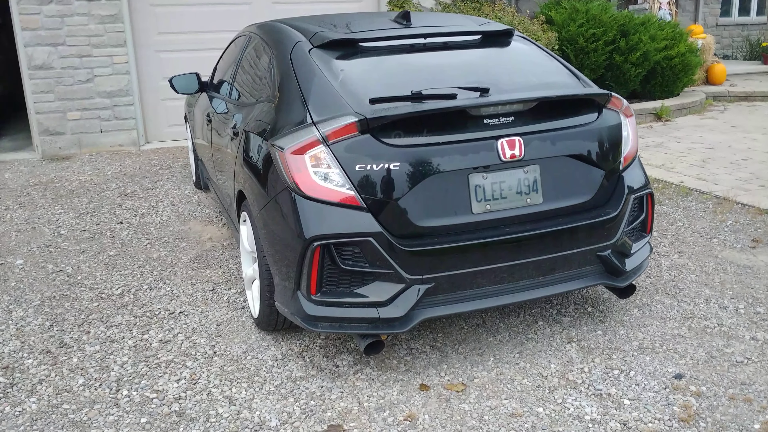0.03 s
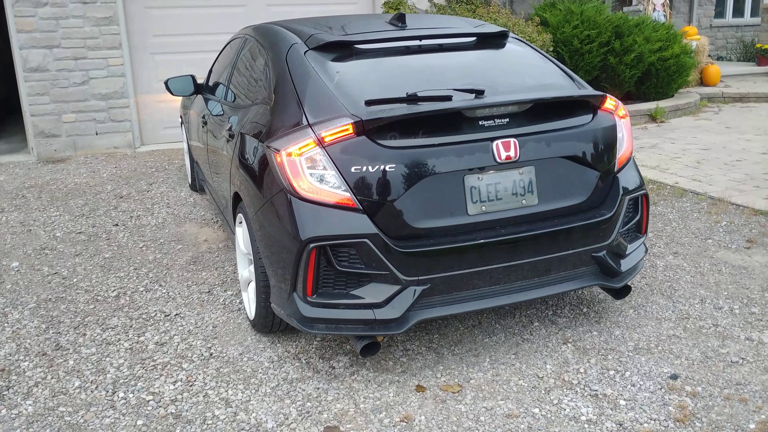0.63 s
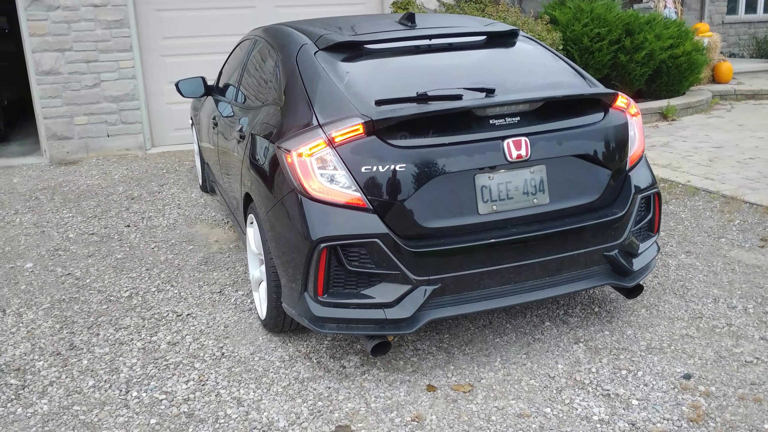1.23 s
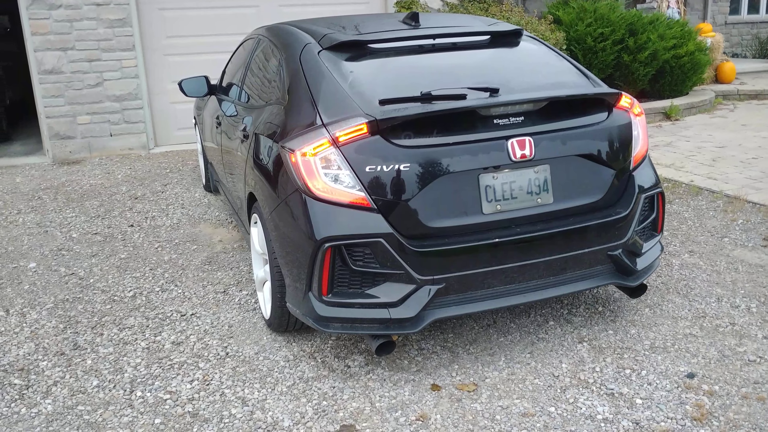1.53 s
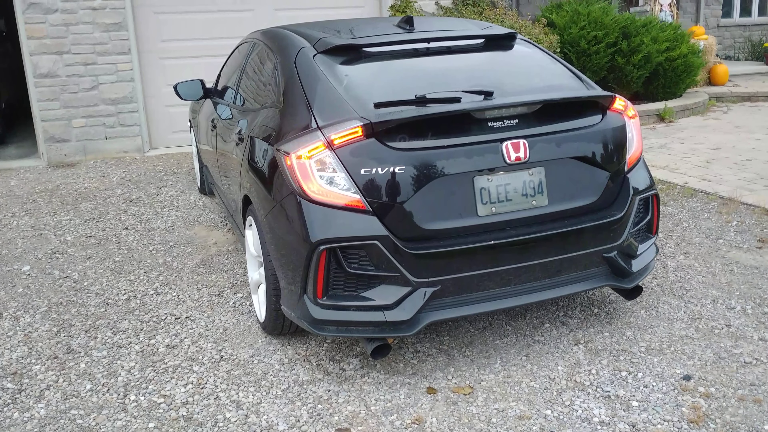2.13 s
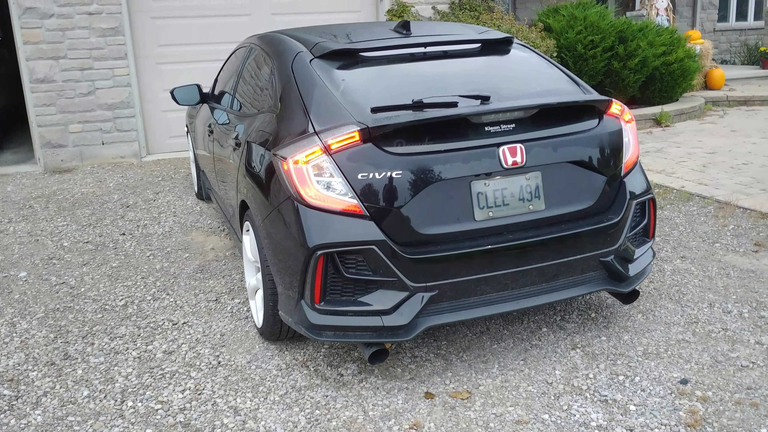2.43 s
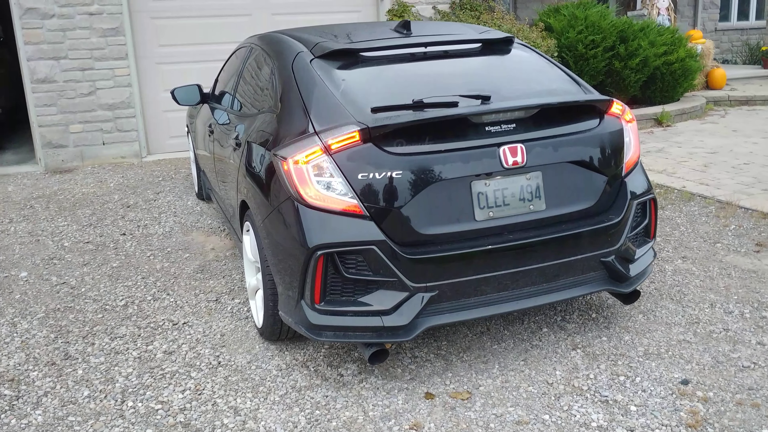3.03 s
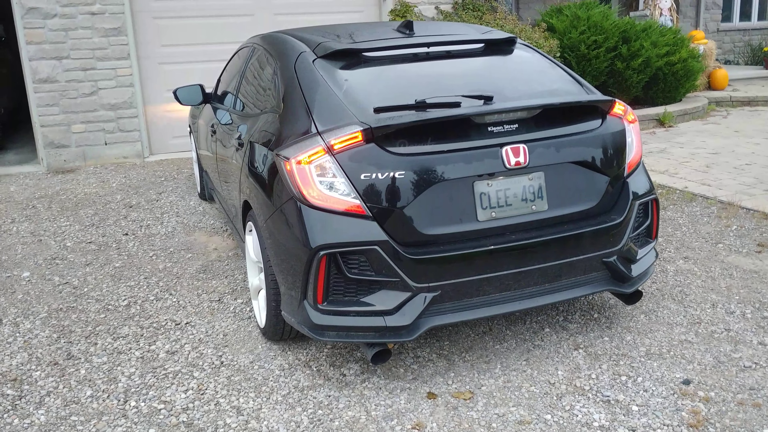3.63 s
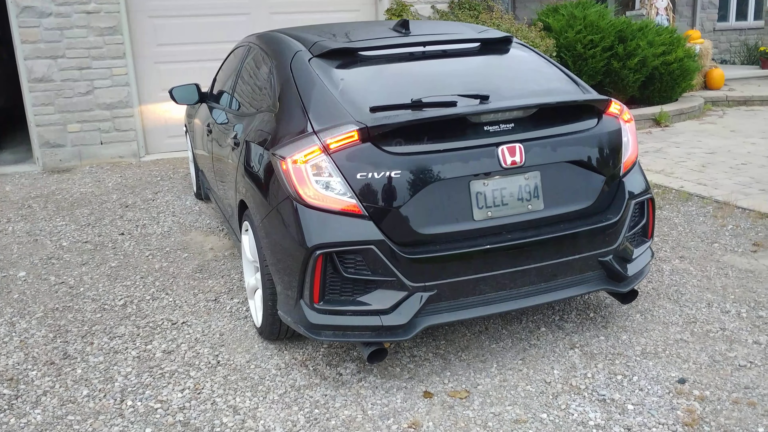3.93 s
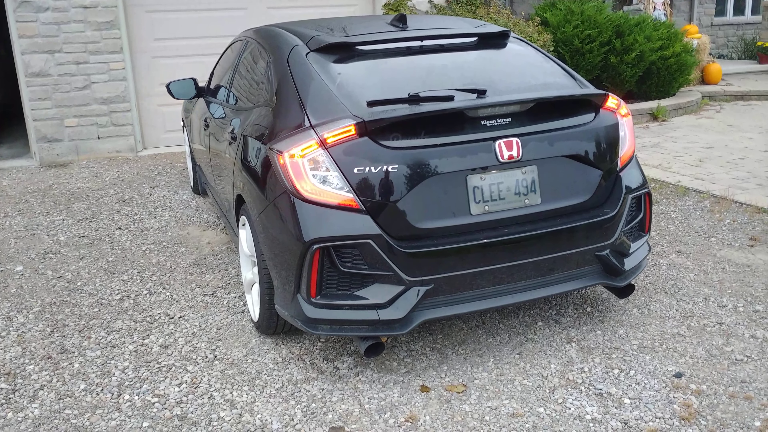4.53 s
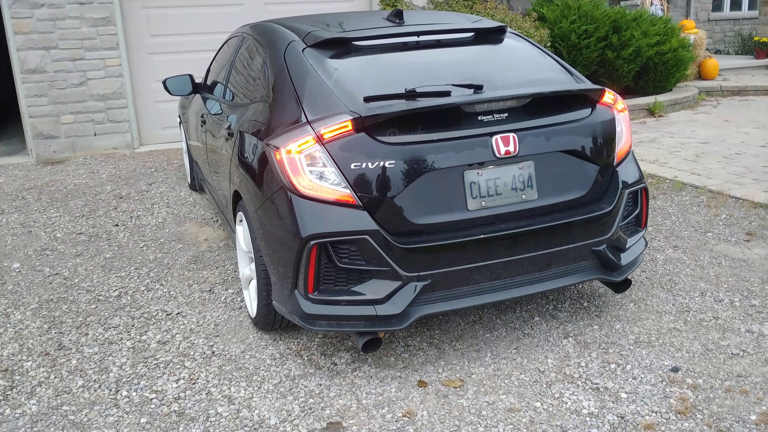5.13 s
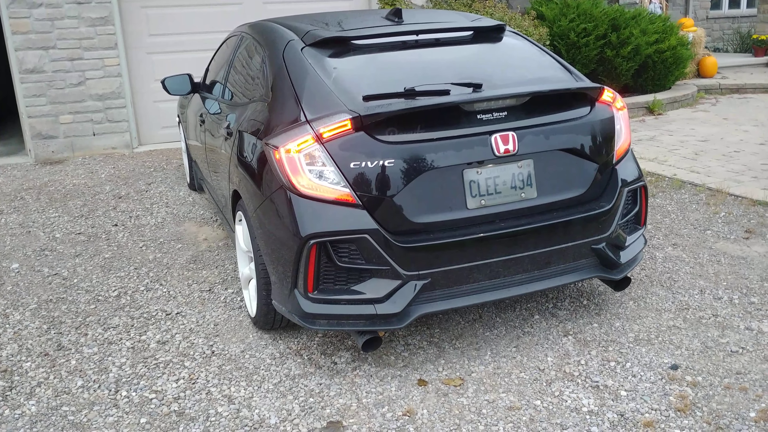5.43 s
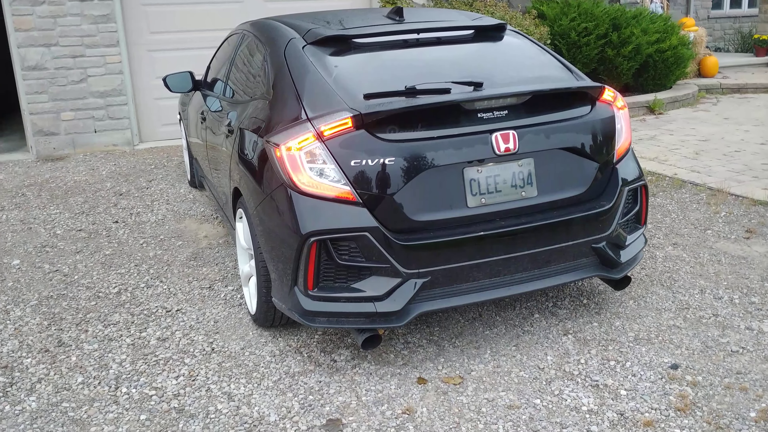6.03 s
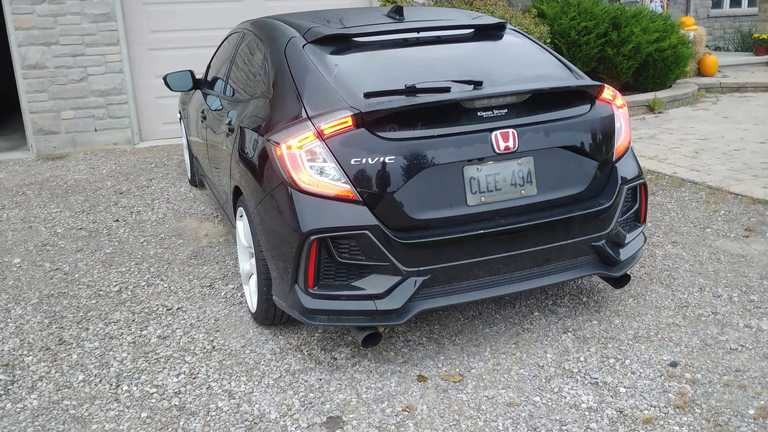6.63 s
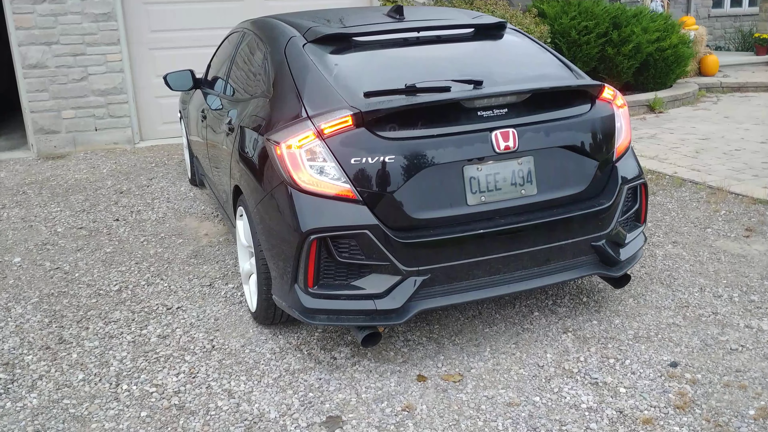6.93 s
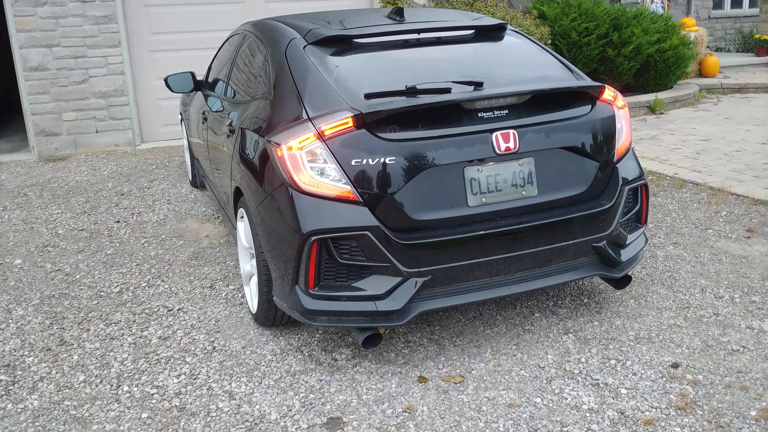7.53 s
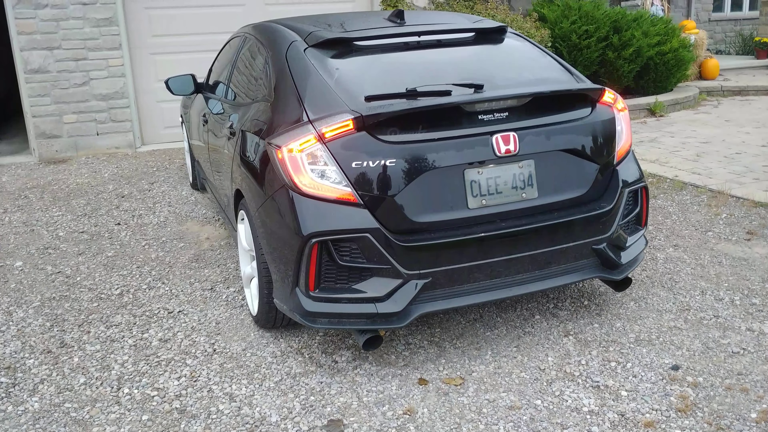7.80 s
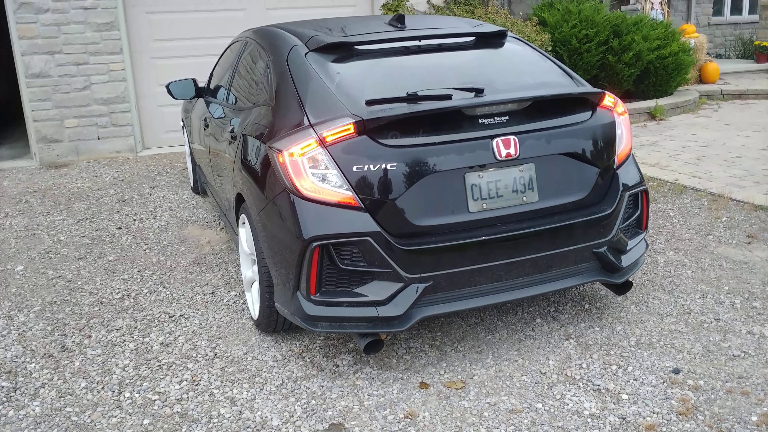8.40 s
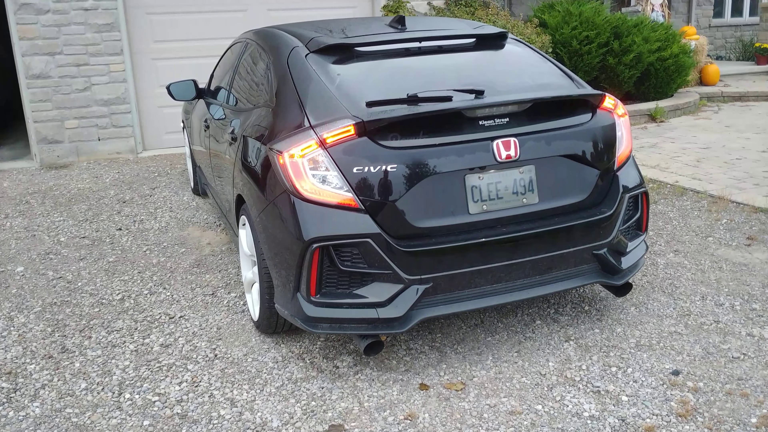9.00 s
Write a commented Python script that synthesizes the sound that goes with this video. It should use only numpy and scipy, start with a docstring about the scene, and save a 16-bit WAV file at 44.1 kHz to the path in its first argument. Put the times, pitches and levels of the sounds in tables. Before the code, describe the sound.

A quiet driveway opens with a low wash of distant traffic and very faint crickets. In the first second a shoe shifts on gravel, crunching softly with a slight thud. Small birds give thin, gliding chirps from about 1.5 to 2.8 seconds, while a far car's tyres swell gently. At 3.2 seconds a car's starter clashes in and whirrs in a few quick pulses. The cold four-cylinder engine coughs at 3.7 seconds and catches by 3.9 with a small pop, far louder than the surroundings. It runs raggedly at first, its speed flaring to a peak around 5 seconds, then eases into a booming fast idle that holds until the end, just past 9 seconds. The microphone is behind the car, so the deep, pulsing exhaust drone dominates, with a light rasp of gas and a faint engine sizzle. Occasional chirps remain faintly audible.

```python
"""A shoe shifts on a gravel driveway over far traffic, small birds and faint crickets.
Some three seconds in, a four-cylinder car is started from cold, with the microphone behind it.
The starter clashes in and whirrs; the engine stumbles, catches, flares and settles to a booming fast idle.
Each firing sends a slug of gas down the free-flowing exhaust, ringing its silencer and pipe,
while the engine bay sizzles from the far end of the car."""
import sys
import numpy as np
from scipy import signal
from scipy.fft import rfft, irfft
from scipy.io import wavfile

SR = 44100
rng = np.random.default_rng(int(sys.argv[2]) if len(sys.argv) > 2 else 0)


def transcribe(u):
    """Save the signal u as a 16-bit wav file named by the first command-line argument.

    u: samples, shape (n,) or (channels, n), limited to [-1, 1]; the rate is SR.
    q: integer samples, one column per channel.
    """
    v = np.clip(np.atleast_2d(u).T, -1, 1)
    q = np.round(v * 32767).astype(np.int16)
    wavfile.write(sys.argv[1], SR, q)


N = 408366
TIME = np.arange(N) / SR
RUNNING_S = 3.893   # the engine runs by itself from here

# the engine's first coughs on the starter: (time [s], strength [dB])
COUGHS = [(3.722, -7.5), (3.777, -4.5), (3.826, -3), (3.858, -1)]
# engine speed: (time [s], firing rate [Hz])
FIRING_RATE = [(3.893, 35.06), (4.2, 45.19), (4.42, 48.53), (4.8, 56.3), (5.03, 58.37), (5.33, 56.91),
               (5.6, 56.93), (5.95, 55.21), (6.4, 52.65), (6.85, 51.3), (7.4, 50.55), (7.7, 51.02),
               (8.0, 51.11), (8.42, 51.81), (8.93, 50.51), (9.26, 51.38)]
# engine load, light in the flare and heavy in the fast idle: (time [s], load above idle [dB])
ENGINE_LOAD = [(3.9, -16.5), (4.15, -14), (4.5, -13.5), (4.75, -8), (5.2, 0), (5.55, -0.5), (6.4, 3.5),
               (6.9, 3), (7.45, 0.5), (8.4, 4.5), (8.95, 2), (9.26, 3.3)]


def exhaust(front_lag_s=0.0027, gulp_ends_s=4.02, gulp_fade_s=0.055):
    """The tailpipe, nearest the microphone: each slug of gas drones, booms, barks and hisses."""
    load_db, = in_time(ENGINE_LOAD)
    # the first firings gulp the air standing in the manifold: fatter, duller slugs
    gulp = np.exp(-np.maximum(TIME - gulp_ends_s, 0) / gulp_fade_s)
    times, slug_db, front_db = firings()
    slugs, fronts = clicks(times, slug_db), clicks(times + front_lag_s, front_db)
    puffs = gas_puffs(times, front_db)
    # (sound, level at idle [dB], growth [dB per dB of load], lift from the gulp [dB])
    parts = [(silencer_drone(slugs), -25.1, .6, 10),
             (pipe_boom(slugs, gulp), -24, .2, 1.5),
             (pipe_bark(fronts, puffs, gulp, load_db), -29.5, .56, 8),
             (gas_rasp(puffs), -46.5, .5, 7.5)]
    return sum(from_db(db + growth * load_db + gulp_db * gulp) * x / x[TIME > RUNNING_S].std()
               for x, db, growth, gulp_db in parts)


def firings(jitter_s=.000025, slug_scatter_db=0.57, front_scatter_db=1.11, ragged_fade_s=0.49):
    """Time, slug strength and front strength of every firing; the cold engine runs raggedly at first."""
    # cylinders in firing order: (slug strength [dB], front strength [dB], lateness [s])
    cylinders = [(-0.25, -5.5, -.0012), (-0.5, 0.5, -.0014), (-0.83, -4.5, -.0012), (0, 0.5, -.0014)]
    count = np.cumsum(in_time(FIRING_RATE)[0] * (TIME > RUNNING_S)) / SR
    beats = np.interp(np.arange(int(count[-1]) + 1) + 1e-6, count, TIME)
    slug_db, front_db, late_s = np.array(cylinders)[np.arange(len(beats)) % len(cylinders)].T
    cough_s, cough_db = np.transpose(COUGHS)
    times = np.r_[cough_s, beats + late_s]
    ragged = 1 + 3.6 * np.exp(-np.maximum(times - RUNNING_S, 0) / ragged_fade_s)
    load_db = np.interp(beats, *np.transpose(ENGINE_LOAD))
    unequal = np.interp(load_db, [-20, 7], [.25, 1])   # load brings out the cylinders' uneven fronts
    chance = rng.standard_normal((len(times), 3)).T * ragged
    slug_db = np.r_[cough_db, slug_db] + slug_scatter_db * chance[1]
    front_db = np.r_[cough_db, front_db * unequal] + front_scatter_db * chance[2]
    return times + jitter_s * chance[0], slug_db, front_db


def silencer_drone(slugs):
    """Slugs ring the silencer, swelling where a multiple of the firing rate meets a resonance."""
    # deep resonances of the silencer: (frequency [Hz], width [Hz], relative gain [dB], polarity)
    modes = [(52, 11, -34, -1), (70.2, 7.2, 4.5, -1), (98.7, 4.7, 12.5, 1)]
    return cut(cut(ring(slugs, modes), 63, "high"), 760, "low")


def pipe_boom(slugs, gulp):
    """Slugs set the column of gas in the pipe booming."""
    # low standing waves: (frequency [Hz], width [Hz], relative gain [dB], polarity)
    modes = [(148.94, 6.7, 4.5, -1), (160.8, 21.7, 3, -1), (222.66, 6.3, 6.5, 1), (281.7, 9.7, 3, 1)]
    return cut(ring(slugs, modes, db_per_octave=-11 * gulp), 700, "low")


def pipe_bark(fronts, puffs, gulp, load_db):
    """The steep front of each pulse and the churning gas ring the pipe higher up."""
    # upper standing waves: (frequency [Hz], width [Hz], relative gain [dB], polarity)
    modes = [(335.5, 24.4, 1.5, -1), (359.6, 7.2, -2.5, 1), (398, 6, -15.5, -1), (444.6, 11, -8.5, 1),
             (470.8, 41.7, -2.5, 1), (504.5, 8.1, -11, 1), (538.7, 16, -5.5, 1), (611.3, 15, -8.5, 1),
             (636.6, 10, -9.5, -1), (701.8, 16, -5.5, -1), (725, 16, -10.5, -1), (807, 6, -14, 1)]
    churn = from_db(-14 + 7 * gulp) * puffs * rng.standard_normal(N)
    edge = .4 * load_db - 2 * gulp   # fronts steepen with load
    bark = -ring(rms_one(fronts) + churn, modes, db_per_octave=edge)
    return cut(cut(bark, 800, "low", order=10), 290, "high", order=4)


def gas_puffs(times, front_db, lag_s=0.002, decay_s=0.011, scatter_db=2.0):
    """Envelope of the turbulence as each slug leaves the tip."""
    gusts = clicks(times + lag_s, 0.17 * front_db + scatter_db * rng.standard_normal(len(times)))
    fading = signal.lfilter([1], [1, -np.exp(-1 / (decay_s * SR))], gusts)
    return rms_one(cut(fading, 260, "low"))


def gas_rasp(puffs):
    """Gas hisses out in puffs; between them a steady flow builds as the engine gathers speed."""
    # rushing gas: (frequency [Hz], relative density [dB])
    spectrum = [(400, -38.5), (800, 5.5), (1100, -2.5), (1400, 1.5), (1650, -0.5), (1950, -11.5),
                (2500, -9.5), (3200, -33), (4700, -15), (6000, -47)]
    flow = np.interp(TIME, [COUGHS[0][0], 4.4], [0, .7])
    return (puffs + flow) * noise(spectrum)


def fuel_pops(attack_s=0.0011):
    """Unburnt fuel cracks in the pipe and rings its tip."""
    # pops: (time [s], level [dB], decay [s])
    pops = [(3.864, -34.5, 0.0049), (7.821, -34, 0.01)]
    return sum(from_db(db) * swell(s, attack_s, 0, decay) for s, db, decay in pops) * tone(1100, 750)


def starter(mesh_hz=1240, clatter_db=-2, housing_db=-6, groan_db=-3, clash_s=3.228, clash_db=-36.5):
    """The pinion clashes in; the motor groans and gear teeth rattle the housing until the engine runs."""
    # resonances of the housing: (frequency [Hz], width [Hz], relative gain [dB])
    modes = [(3330, 110, 14), (4940, 60, 11), (6400, 370, 4), (7130, 98, 12), (8230, 110, -8),
             (8300, 58, -14)]
    # gear clatter: (frequency [Hz], relative density [dB])
    clatter_spectrum = [(710, -32), (1200, -15), (1570, 16), (1780, -18), (2340, 8), (3450, -9), (3870, 2),
                        (4870, 4), (5600, -3), (6190, 3), (8600, -3.5), (11200, -38), (18900, -120)]
    # the pinion hitting the ring gear: (frequency [Hz], relative density [dB])
    clash_spectrum = [(60, -18), (130, -3), (430, -6), (600, -15), (1000, -1), (1500, -8), (3700, -14),
                      (7200, -8), (8700, -22), (11000, -37), (15500, -42)]
    # the motor labours at each compression: (time [s], level [dB])
    compressions = [(3.27, -55.5), (3.436, -52), (3.619, -52.5), (3.741, -48.5), (3.84, -49.5)]
    teeth_passed = np.floor(np.cumsum(mesh_hz * (1 + 0.033 * drift(25))) / SR)
    knocks = np.diff(teeth_passed, prepend=0) * (1 + 2 * rng.standard_normal(N))
    ringing = sum(from_db(db) * resonate(knocks, hz, width) for hz, width, db in modes)
    housing = rms_one(cut(ringing, 12000, "low", order=4))
    clatter = colour(grains(per_s=11000, spread_db=1.5), clatter_spectrum)
    groan = tone(383, 90) + tone(970, 210)
    whirr = from_db(clatter_db) * clatter + from_db(housing_db) * housing + from_db(groan_db) * groan
    efforts = [from_db(db) * swell(s, attack_s=.014, hold_s=.077, decay_s=.058)
               for s, db in compressions]
    clash = swell(clash_s, attack_s=.019, hold_s=.022, decay_s=.016) * noise(clash_spectrum)
    return np.max(efforts, axis=0) * whirr + from_db(clash_db) * clash


def engine_bay(onset_s=0.11, idle_db=-54, idle_hz=51.3, db_per_octave=5):
    """At the far end of the car, injectors, valves and belts merge into a sizzle that grows with speed."""
    # the bay heard from behind: (frequency [Hz], relative density [dB])
    spectrum = [(1700, -2), (3000, -8), (3900, -7), (4300, -9.5), (4700, -10), (5400, -15.5), (6500, -13.5),
                (7250, -11.5), (8400, -17), (9300, -25), (10200, -22.5), (11500, -29), (13200, -26),
                (15500, -42)]
    running = np.clip((TIME - COUGHS[0][0]) / onset_s, 0, 1)
    level_db = idle_db + db_per_octave * np.log2(in_time(FIRING_RATE)[0] / idle_hz)
    return running * from_db(level_db) * colour(grains(per_s=9000, spread_db=3.5), spectrum)


def shoe_on_gravel(thud_s=.37, thud_db=-46):
    """Driveway stones grind under a shoe; the heaviest shift also thuds in the ground."""
    # shifts of the shoe: (time [s], level [dB], rise and fall time [s])
    scuffs = [(0.274, -54, .006), (0.332, -49.5, 0.011), (0.367, -43, 0.014), (0.403, -52, 0.013),
              (.44, -56, 0.011), (0.707, -52, 0.015), (0.926, -54.5, 0.021), (7.333, -54.5, 0.018)]
    # grinding stones: (frequency [Hz], relative density [dB])
    spectrum = [(1180, -22), (2000, 2.5), (4110, -7), (4500, -5), (5440, -14), (5960, -4), (7940, -4),
                (8600, -12), (11200, -28), (18900, -120)]
    press = sum(from_db(db) * np.exp(-np.abs(TIME - s) / fall) for s, db, fall in scuffs)
    ground = rms_one(resonate(rng.standard_normal(N), 350, 250))
    thud = from_db(thud_db) * np.exp(-np.abs(TIME - thud_s) / 0.11) * ground
    return press * colour(grains(per_s=1900, spread_db=7), spectrum) + cut(thud, 940, "low")


def birds(echo_db=-6, echo_decay_s=0.038):
    """Gliding whistles, some buzzy, reach the microphone directly and off the walls of the house."""
    # notes: (time [s], length [s], start [Hz], middle [Hz], end [Hz], buzz [share of pitch], level [dB])
    notes = [(0.68, 0.19, 7750, 7400, 7330, 0.021, -65), (1.52, 0.46, 8130, 8250, 7800, 0.01, -71),
             (1.677, 0.096, 5800, 5620, 5960, 0.07, -57.5), (1.74, 0.14, 6170, 6580, 5100, 0.04, -58.5),
             (1.883, 0.24, 4050, 4400, 4940, 0.059, -65), (2.143, 0.087, 6740, 5780, 5050, 0.06, -56.5),
             (2.348, 0.081, 4200, 3780, 3380, 0.04, -57), (2.574, 0.068, 7600, 7550, 7400, 0.02, -69),
             (2.6, 0.09, 3950, 4000, 3700, 0.04, -68), (2.676, 0.13, 6200, 6240, 6840, 0.015, -72),
             (4.648, 0.07, 8400, 7800, 7550, 0.022, -63), (4.722, 0.088, 6450, 6050, 5350, 0.13, -59),
             (5.016, 0.17, 3600, 3080, 2860, 0.016, -57.5),
             (5.536, 0.052, 10100, 10260, 10300, 0.0034, -63), (6.27, 0.023, 3260, 3700, 4220, 0.031, -53),
             (6.614, 0.029, 7300, 7300, 7250, 0.012, -61.5), (7.53, 0.051, 3830, 3360, 4220, 0.006, -53),
             (8.214, 0.15, 6500, 6500, 6660, 0.015, -66), (8.362, 0.034, 4120, 3560, 4000, 0.015, -53.5),
             (8.868, 0.068, 4070, 3780, 3290, 0.02, -52.5)]
    song, buzz = np.zeros(N), drift(380)
    for s, length, start_hz, middle_hz, end_hz, depth, db in notes:
        at = np.flatnonzero((TIME >= s) & (TIME < s + length))
        progress = np.linspace(0, 1, len(at))
        glide = np.polyfit([0, .5, 1], [start_hz, middle_hz, end_hz], 2)
        hz = np.polyval(glide, progress) * (1 + depth * buzz[at])
        arch = np.sqrt(2 * np.abs(np.sin(np.pi * progress)))
        song[at] += from_db(db) * arch * np.sin(2 * np.pi * np.cumsum(hz) / SR)
    walls = rng.standard_normal(SR // 2) * np.exp(-TIME[:SR // 2] / echo_decay_s)
    return song + from_db(echo_db) * signal.fftconvolve(song, walls / np.linalg.norm(walls))[:N]


def far_traffic(waver_db=.5, hum_db=-61, pass_s=3.16, pass_db=-49.5, pass_width_s=.8):
    """A distant road with a faint hum; the narrow roar of one car's tyres comes and goes."""
    # the road heard from the driveway: (time [s], level [dB])
    levels = [(0, -44.5), (1.6, -47.5), (3.2, -47.5)]
    # its rumble: (frequency [Hz], relative density [dB])
    spectrum = [(21, -50), (35, -9.5), (96, -3.5), (242, -11), (266, -12), (312, -12), (421, -13.5),
                (987, -6.5), (2980, -18), (4840, -33), (7660, -37.5), (8600, -45.5), (11200, -62.5),
                (18900, -120)]
    road_db = in_time(levels)[0] + waver_db * drift(9)
    road = from_db(road_db) * cut(noise(spectrum), 54, "high", order=3)
    nearness = 1 / np.hypot(1, (TIME - pass_s) / pass_width_s)
    return road + from_db(pass_db) * nearness * tone(822, 240) + from_db(hum_db) * tone(452, 38)


def crickets(near_db=-76, far_db=-77, stroke_hz=25.6):
    """The nearer cricket pulses its wings; a farther one blurs into a steady trill."""
    strokes = rms_one(1 + np.sin(2 * np.pi * stroke_hz * TIME))
    return from_db(near_db) * strokes * tone(5380, 210) + from_db(far_db) * tone(5970, 92)


def from_db(db):
    """Decibels to gain."""
    return 10 ** (np.asarray(db) / 20)


def rms_one(x):
    """Scale to unit rms."""
    return x / np.sqrt(np.mean(x ** 2) + 1e-20)


def in_time(rows):
    """Each column of a curve, sample by sample."""
    s, *columns = np.transpose(rows)
    return [np.interp(TIME, s, c) for c in columns]


def drift(per_s):
    """A random wander with spread about 1."""
    knots = np.arange(0, TIME[-1] + 1, 1 / per_s)
    return np.interp(TIME, knots, rng.standard_normal(4096)[:len(knots)])


def swell(start_s, attack_s, hold_s, decay_s):
    """An envelope that rises, holds and dies away."""
    age = TIME - start_s
    return np.clip(age / attack_s, 0, 1) * np.exp(-np.maximum(age - attack_s - hold_s, 0) / decay_s)


def clicks(times, db):
    """One click per time."""
    out = np.zeros(N + 1)
    out[np.minimum((times * SR).astype(int), N)] = from_db(db)
    return out[:N]


def grains(per_s, spread_db):
    """Random clicks of uneven size."""
    hits = rng.random(N) < per_s / SR
    return hits * from_db(spread_db * rng.standard_normal(N)) * rng.choice([-1, 1], N)


def colour(x, spectrum):
    """Give a steady source a spectrum; rms 1."""
    hz, db = np.transpose(spectrum)
    bins = np.maximum(np.fft.rfftfreq(N, 1 / SR), 1)
    gain = from_db(np.interp(np.log(bins), np.log(hz), db))
    return rms_one(irfft(rfft(x) * gain, N))


def noise(spectrum):
    """Coloured noise; rms 1."""
    return colour(rng.standard_normal(N), spectrum)


def tone(hz, width):
    """A narrow, wavering band of noise; rms 1."""
    return rms_one(resonate(resonate(rng.standard_normal(N), hz, width), hz, width))


def resonate(x, hz, width):
    """One resonance with gain 1 at its peak."""
    r = np.exp(-np.pi * width / SR)
    feedback = [1, -2 * r * np.cos(2 * np.pi * hz / SR), r * r]
    return signal.lfilter(np.array([1, 0, -1]) * (1 - r * r) / 2, feedback, x + 1e-18)


def ring(x, modes, db_per_octave=0):
    """Parallel resonances, each with its polarity, tilted about the first."""
    return sum(sign * from_db(db + db_per_octave * np.log2(hz / modes[0][0])) * resonate(x, hz, width)
               for hz, width, db, sign in modes)


def cut(x, hz, kind, order=2):
    """Butterworth high- or low-pass."""
    return signal.sosfilt(signal.butter(order, hz, kind, fs=SR, output="sos"), x)


def scene():
    """The car and the driveway around it, in mono from behind the tailpipe."""
    car = exhaust() + fuel_pops() + engine_bay() + starter()
    return (car + shoe_on_gravel() + birds() + crickets() + far_traffic())[None]


def record(dry, hiss_db=-80, cutoff_hz=15700):
    """The microphone adds a faint hiss; the top is cut steeply."""
    heard = dry + from_db(hiss_db) * rng.standard_normal(N)
    return signal.sosfilt(signal.ellip(10, .1, 80, cutoff_hz, fs=SR, output="sos"), heard)


dry = scene()
out = record(dry)
transcribe(out)
```